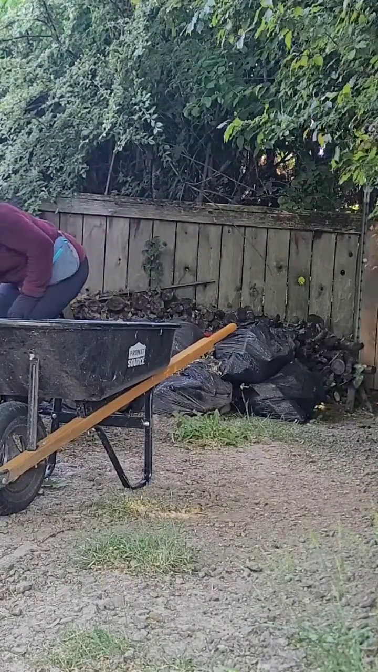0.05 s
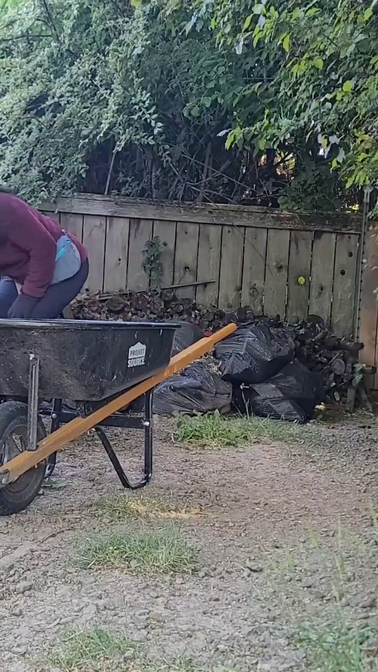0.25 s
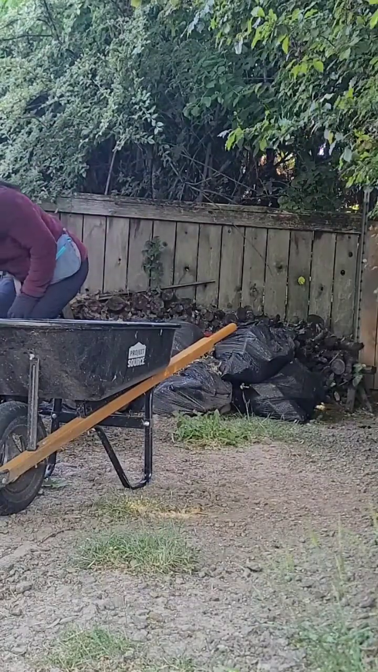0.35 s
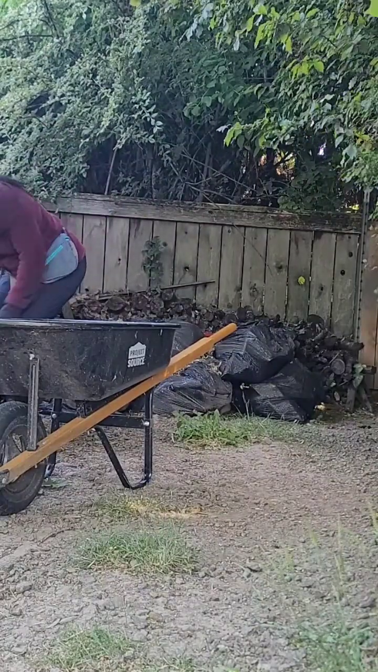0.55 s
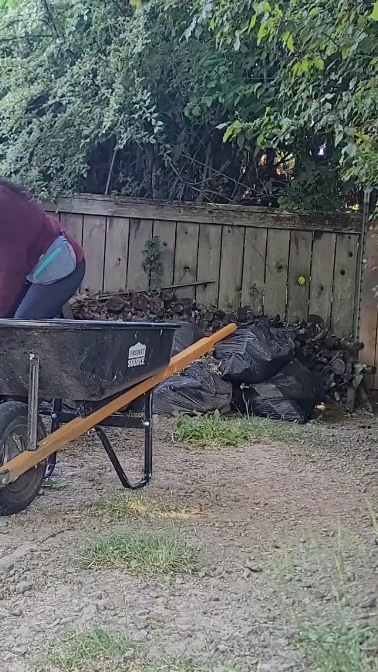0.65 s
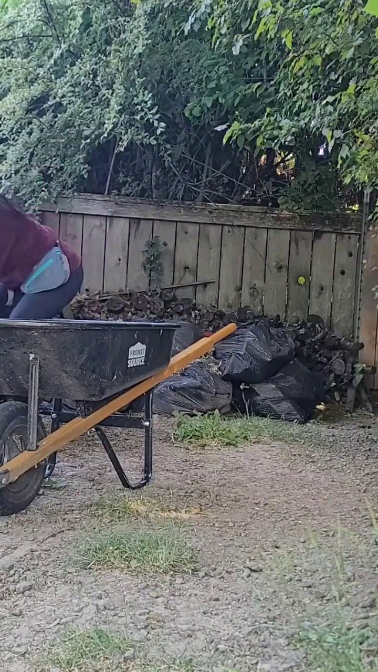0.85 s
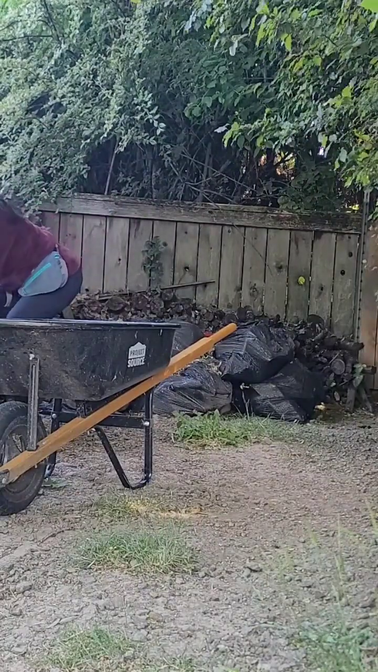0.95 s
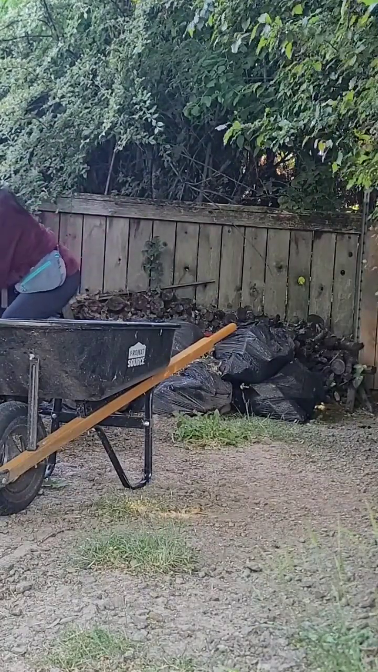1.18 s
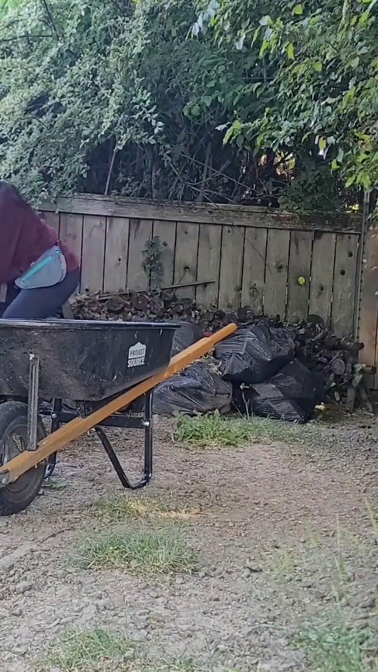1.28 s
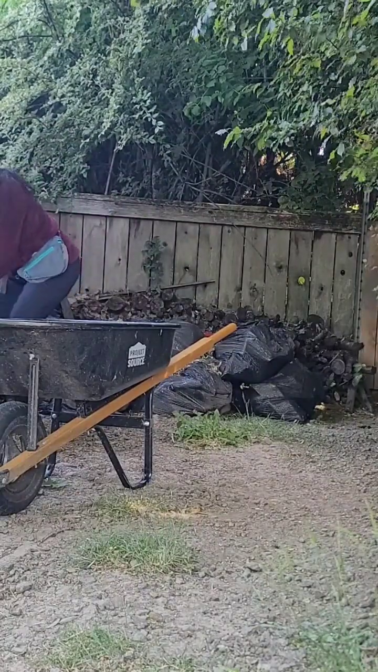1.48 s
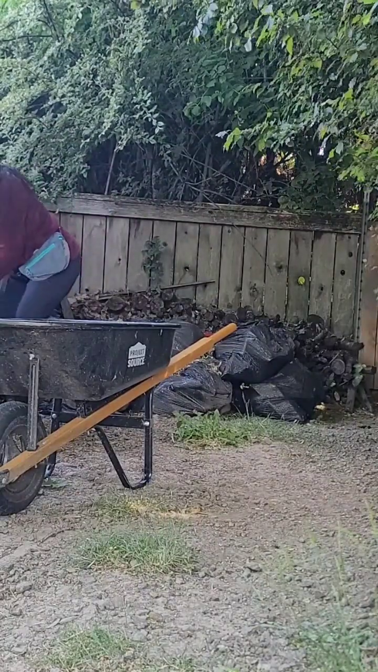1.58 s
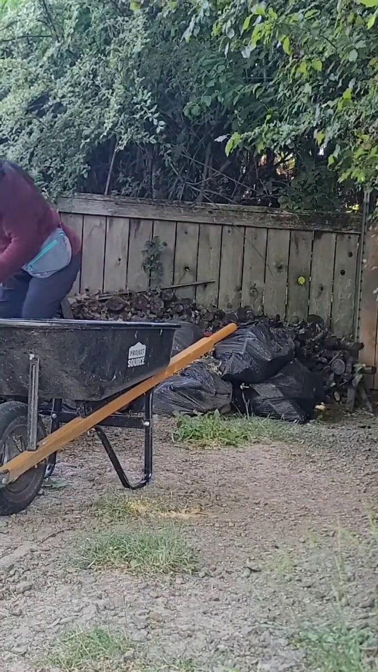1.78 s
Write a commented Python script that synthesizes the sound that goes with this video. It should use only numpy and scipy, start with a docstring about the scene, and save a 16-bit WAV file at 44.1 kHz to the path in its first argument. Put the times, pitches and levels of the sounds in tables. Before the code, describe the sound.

Empty cans rattle and crackle in a plastic bag lifted twice, then settling in a yard.

```python
"""A plastic bag of empty cans, heaved twice and set down, a few metres off to the left in a fenced yard.
Thin can walls crunch, crackle and ring against each other while the whole load thuds and drags.
The plastic squeaks as it is pulled taut; as the bag settles it swishes, hollow bottles bump
and loose cans ping. A pair of microphones picks up the clatter, its quick return off ground
and fence, and a low outdoor rumble."""
import sys
import numpy as np
from scipy import signal
from scipy.fft import rfft, irfft, next_fast_len
from scipy.io import wavfile

SR = 44100
rng = np.random.default_rng(int(sys.argv[2]) if len(sys.argv) > 2 else 0)


def put_to_file(sound):
    """Save the sound as 16-bit audio at rate SR, in the file named by the first command-line argument."""
    columns = np.atleast_2d(sound).T  # one column per channel
    safe = np.clip(columns, -1, 1)
    whole_steps = np.round(safe * 32767)
    wavfile.write(sys.argv[1], SR, whole_steps.astype(np.int16))


N = 81585
T = np.arange(N) / SR

# Outdoor rumble. Each row: frequency in Hz, relative level in dB.
RUMBLE_SPECTRUM = [(25, -21), (45, -7), (68, 6.5), (100, -6.5), (170, -16.5), (400, -29.5), (1300, -36),
                   (4000, -29), (15000, -49)]
# The load stirring in the bag. Each row: time in seconds, force level in dB.
STIRRING = [(0, -42), (.04, -42), (.09, -36.5), (.2, -34.5), (.72, -49), (.76, -43.5), (.795, -32.5),
            (.84, -39.5), (.89, -34), (1.2, -42.5), (1.32, -41.5), (1.4, -54), (1.56, -43), (1.66, -55.5),
            (1.85, -67.5)]
# One list per heave. Each row: time in seconds, relative crunch force and ringing force in dB.
HEAVES = [
    [(.226, -30.5, -27.5), (.245, -28.5, -22.5), (.31, -28.5, -21), (.392, -29, -25), (.44, -23, -18),
     (.52, -26, -19), (.6, -31, -25.5), (.635, -37.5, -35.5), (.68, -39, -34), (.715, -58, -46.5)],
    [(.903, -30, -24), (.945, -32.5, -30.5), (.999, -29, -27), (1.037, -24, -23), (1.085, -26, -26.5),
     (1.119, -33, -29.5), (1.155, -45, -43), (1.19, -50.5, -62)],
]
# Single knocks. Each row: start in seconds, crunch force and ringing force in dB, rattle decay in seconds.
KNOCKS = [(.061, -28, -36, .007), (.121, -32, -29, .035), (.226, -22, -21, .012), (.297, -26, -14, .008),
          (.331, -28, -13, .008), (.436, -20, -14, .01), (.463, -24, -14, .004), (.502, -22, -15, .008),
          (.56, -26, -16, .006), (.59, -27, -19, .005), (.771, -35, -40, .015), (.902, -21, -22, .008),
          (.943, -23, -22, .005), (.968, -25, -19, .012), (1.026, -21, -20, .01), (1.261, -37, -39, .018),
          (1.29, -35, -39, .02), (1.312, -37, -38, .012), (1.434, -29, -46, .03), (1.451, -19, -25, .017),
          (1.489, -21, -26, .02), (1.547, -24, -36, .004), (1.624, -43, -58, .008), (1.678, -33, -49, .006),
          (1.699, -30, -33, .01)]
# Dead crunch of crumpling walls and plastic. Each row: frequency in Hz, relative level in dB.
CRUNCH_SPECTRUM = [(60, -27), (110, -15.5), (180, -20), (290, -21), (430, -7.5), (600, -12.5), (780, -3),
                   (1000, -6), (1350, 0.5), (1800, -1), (2300, -9.5), (3000, -16), (4500, -17),
                   (6500, -14.5), (8000, -35.5), (15000, -28.5)]
# Sharp crackle of thin metal. Each row: frequency in Hz, relative level in dB.
CRACKLE_SPECTRUM = [(500, -32), (1500, 2), (2300, 2.5), (3200, -7), (4100, -8), (4600, -10.5), (6200, 5.5),
                    (7700, -58.5), (9000, -22), (9800, -18), (11000, -25), (12200, -48), (14000, -25),
                    (15800, -38)]
# Modes of an empty can. Each row: pitch in Hz, relative level in dB, spread among cans in Hz,
# time to fall 60 dB in seconds.
CAN_MODES = [(3568, -5, 79, 0.19), (3759, -7, 240, 0.024), (5193, -6, 136, 0.058), (5716, -13, 248, 0.077),
             (6130, -13, 150, 0.14), (6660, -22.5, 200, 0.021), (8550, -18.5, 140, 0.045),
             (9050, -19.5, 130, 0.13), (10360, -23.5, 170, 0.16), (11020, -24.5, 200, 0.084),
             (13000, -29, 190, 0.093), (13800, -26.5, 160, 0.057), (15000, -27, 380, 0.055)]
# The load thudding and dragging. Each row: time in seconds, level in dB.
THUD_LEVELS = [(0, -69.5), (.26, -47.5), (.32, -43), (.45, -38), (.62, -38.5), (.69, -58.5), (.86, -53.5),
               (.91, -47), (1.02, -44.5), (1.12, -43), (1.18, -55.5), (1.3, -44), (1.38, -79), (1.45, -53),
               (1.57, -51), (1.62, -67), (1.85, -79)]
# Tone of that thudding. Each row: frequency in Hz, relative level in dB.
THUD_SPECTRUM = [(30, -20), (60, 0), (100, -2.5), (135, -8), (180, 6), (240, -19), (400, -17),
                 (1500, -22.5), (8000, -57)]
# Squeaks just before the second heave. Each row: start in seconds, pitch in Hz, level in dB.
SQUEAKS = [(.853, 6400, -41), (.872, 6600, -38), (.888, 6650, -55)]
# Bottles bumping. Each row: start in seconds, pitch in Hz, level in dB.
BOTTLE_BUMPS = [(1.129, 510, -32), (1.168, 566, -27), (1.211, 510, -23.5), (1.257, 360, -36),
                (1.288, 445, -30), (1.364, 383, -31), (1.368, 600, -41), (1.396, 444, -31)]
# Plastic sliding. Each row: start in seconds, level in dB, decay in seconds.
SWISHES = [(1.2, -55.5, 0.46), (1.357, -36.5, 0.03)]
# Tone of the sliding plastic. Each row: frequency in Hz, relative level in dB.
SWISH_SPECTRUM = [(500, -0.5), (2500, -21), (6000, -3.5), (9000, -9), (14000, -8), (16000, -17)]
# Taps on loose cans. Each row: start in seconds, level in dB.
PINGS = [(1.213, -33.5), (1.262, -47), (1.311, -50), (1.627, -50.5)]
# Modes of a loose can. Each row: pitch in Hz, relative level in dB, time to fall 60 dB in seconds.
PING_MODES = [(3095, -1.5, 0.065), (3180, -1, 0.066), (4800, 0, .07), (5510, -5, .1), (6080, -20, .07),
              (7150, -4.5, 0.066), (7140, -8, 0.076)]
# Arrival at the microphones. Each row: frequency in Hz, phase lead of the left one in radians.
LEFT_LEAD = [(30, 1), (100, -0.1), (300, 0), (800, 1.24), (1500, 2), (3000, 4), (3700, 3.5), (5200, 4.2),
             (6100, 5.0), (7000, 7.5), (8500, 9), (11000, 9.5), (15000, 13)]
# Balance of the microphones. Each row: frequency in Hz, level of left over right in dB.
LEFT_BALANCE = [(60, -0.5), (250, -0.7), (600, 1.5), (1500, 1.5), (2800, 3), (3600, -2), (5200, 2),
                (6100, -3.5), (7200, 0), (8400, 6), (9200, 2.5), (11000, -2.5), (15000, 1.5)]

BAG_WIDTH = 0.23   # spread of directions across the bag, as a fraction of the left lead


def from_db(db):
    """Decibels to gain."""
    return 10 ** (np.asarray(db) / 20)


def unit_power(x):
    """Scale to unit power."""
    return x / np.sqrt(np.mean(x ** 2) + 1e-20)


def at_hz(points, hz):
    """Read a table on a log-frequency axis."""
    freqs, values = np.transpose(points)
    return np.interp(np.log(np.maximum(hz, 1)), np.log(freqs), values)


def dying(start, decay_s):
    """A sudden start and an exponential decay."""
    return (T >= start) * np.exp(-np.maximum(T - start, 0) / decay_s)


def ring(x, hz, t60):
    """One mode: a unit click sets a sine of height 1 ringing."""
    radius, angle = from_db(-60 / (t60 * SR)), 2 * np.pi * hz / SR
    return signal.lfilter([0, np.sin(angle)], [1, -2 * radius * np.cos(angle), radius ** 2], x + 1e-18)


def colour(x, spectrum, size=4096):
    """Causal filter of unit energy, shaped like the given spectrum."""
    hz = np.arange(size // 2 + 1) * SR / size
    cepstrum = irfft(np.log(from_db(at_hz(spectrum, hz))))
    cepstrum[size // 2:] = 0
    response = irfft(np.exp(2 * rfft(cepstrum)))
    return signal.fftconvolve(x, response / np.linalg.norm(response))[:N]


def at_microphones(x, direction=1):
    """A sound from the left reaches the left microphone first; direction 1 is the middle of the bag."""
    size = next_fast_len(N + 2000)
    hz = np.arange(size // 2 + 1) * SR / size
    lag = np.exp(-1j * direction * at_hz(LEFT_LEAD, hz))
    return np.array([x, irfft(rfft(x, size) * lag, size)[:N]])


def outdoor_rumble(level_db=-51.5, likeness=0.91):
    """The low background of the yard, nearly the same at both microphones."""
    mid, side = (colour(noise, RUMBLE_SPECTRUM) for noise in rng.standard_normal((2, N)))
    pair = np.sqrt((1 + likeness) / 2) * mid + np.sqrt((1 - likeness) / 2) * np.array([side, -side])
    return from_db(level_db) * pair


def contacts(per_s=2600, spread_db=4.0, surge_db=1, surges_per_s=150):
    """Tiny collisions inside the bag: random clicks of uneven strength, in slight surges."""
    clicks = (rng.random(N) < per_s / SR) * rng.choice([-1, 1], N)
    strength_db = spread_db * np.clip(rng.standard_normal(N), -2, 2)
    surge = np.interp(T * surges_per_s, np.arange(1000), rng.standard_normal(1000))
    return unit_power(clicks * from_db(strength_db + surge_db * surge))


def handling(clicks, column, heave_db, attack_s=0.0036, release_s=0.022, knock_rise_s=.0015):
    """Stirring, heaves and knocks set the force of the contacts; column 1 is crunch, 2 is ringing."""
    power = from_db(np.interp(T, *np.transpose(STIRRING))) ** 2
    for heave in map(np.array, HEAVES):
        times = heave[:, 0]
        gate = np.clip(np.minimum((T - times[0]) / attack_s, (times[-1] - T) / release_s) + 1, 0, 1)
        power += (gate * from_db(heave_db + np.interp(T, times, heave[:, column]))) ** 2
    impacts = np.zeros(N)
    for knock in KNOCKS:   # one hard hit, then a short rattle
        start, gain, decay_s = knock[0], from_db(knock[column]), knock[-1]
        impacts[int(start * SR)] = 3.5 * gain
        rise = np.clip((T - start) / knock_rise_s, 0, 1)
        power += (gain * dying(start, decay_s) * rise) ** 2
    return clicks * np.sqrt(power) + impacts


def crumpling(force, spectrum, level_db, places=5):
    """The dead part of the contacts, from several places in the bag, each with its own reflections."""
    place_hit, out = rng.integers(0, places, N), 0
    for k, place in enumerate(np.linspace(-1, 1, places)):
        direct = at_microphones(colour(force * (place_hit == k), spectrum), 1 + BAG_WIDTH * place)
        out = out + direct + yard_reflections(direct)
    return from_db(level_db) * out


def ringing_cans(force, count=24, level_db=-2):
    """Each contact rings one of many cans, all dented and so tuned a little differently."""
    can_hit, out = rng.integers(0, count, N), 0
    ranks = (np.arange(count) + .5) / count
    bell_curve = np.log(ranks / (1 - ranks)) / np.sqrt(np.pi)
    detunings = np.array([rng.permutation(bell_curve) for _ in CAN_MODES]).T
    for k in range(count):
        hits, can = np.flatnonzero(can_hit == k), 0
        for (hz, db, spread_hz, t60), detune in zip(CAN_MODES, detunings[k]):
            strikes = np.zeros(N)
            strikes[hits] = force[hits] * rng.standard_normal(len(hits))
            unit_energy = np.sqrt(4 * np.log(1000) / (t60 * SR))
            can = can + from_db(db) * unit_energy * ring(strikes, hz + spread_hz * detune, t60)
        out = out + at_microphones(can, 1 + BAG_WIDTH * rng.standard_normal())
    return from_db(level_db) * out


def yard_reflections(x, t60=0.1, delay_s=.002, low_cut_hz=288, level_db=-1.5):
    """Scattered returns from ground and fence, different at each microphone."""
    t = T[:SR // 2]
    tails = rng.standard_normal((2, len(t))) * (t > delay_s) * 1000.0 ** (-t / t60)
    tails /= np.linalg.norm(tails, axis=1, keepdims=True)
    reflected = signal.fftconvolve(x, tails, axes=1)[:, :N]
    low_cut = signal.butter(2, low_cut_hz, "high", fs=SR, output="sos")
    return from_db(level_db) * signal.sosfilt(low_cut, reflected)


def load_thuds():
    """The bulk of the bag thuds and drags: swells of low noise."""
    level = from_db(np.interp(T, *np.transpose(THUD_LEVELS)))
    return at_microphones(colour(rng.standard_normal(N), THUD_SPECTRUM) * level)


def plastic_squeaks(decay_s=0.014, t60=0.053):
    """The bag is pulled taut and gives short, high squeaks."""
    out = 0
    for start, hz, db in SQUEAKS:
        tone = unit_power(ring(rng.standard_normal(N), hz, t60))
        out = out + from_db(db) * tone * dying(start, decay_s)
    return at_microphones(out)


def bottle_bumps(rattle_s=.022, t60=.05, softness_hz=1100):
    """Soft rattling bumps, each waking one damped hollow note."""
    out = 0
    for start, hz, db in BOTTLE_BUMPS:
        rattle = rng.standard_normal(N) * dying(start, rattle_s)
        out = out + from_db(db) * ring(rattle / np.linalg.norm(rattle), hz, t60)
    soft_contact = signal.butter(2, softness_hz, fs=SR, output="sos")
    return at_microphones(signal.sosfilt(soft_contact, out))


def plastic_swishes():
    """Plastic slides on plastic with a bright friction hiss."""
    level = sum(from_db(db) * dying(start, decay_s) for start, db, decay_s in SWISHES)
    return at_microphones(colour(rng.standard_normal(N), SWISH_SPECTRUM) * level)


def can_pings():
    """A loose can is tapped and rings clearly."""
    taps = np.zeros(N)
    for start, db in PINGS:
        taps[int(start * SR)] = from_db(db)
    return at_microphones(sum(from_db(db) * ring(taps, hz, t60) for hz, db, t60 in PING_MODES))


def scene():
    """The bag a few metres left of the microphones, with the yard's reflections and rumble."""
    clicks = contacts()
    crunch_force = handling(clicks, column=1, heave_db=3.5)
    ring_force = handling(clicks, column=2, heave_db=6.0)
    crunch = crumpling(crunch_force, CRUNCH_SPECTRUM, level_db=-0.5)
    crackle = crumpling(ring_force, CRACKLE_SPECTRUM, level_db=-11)
    bag = ringing_cans(ring_force) + can_pings() + bottle_bumps()
    bag += plastic_swishes() + plastic_squeaks() + load_thuds()
    return crunch + crackle + bag + yard_reflections(bag) + outdoor_rumble()


def record(dry, cutoff_hz=15750):
    """Each microphone has its own colour; any peak over full scale clips and the top is cut."""
    balance_db = at_hz(LEFT_BALANCE, np.arange(N + 1) * SR / (2 * N))
    microphone_gains = from_db(np.outer([.5, -.5], balance_db))
    heard = irfft(rfft(dry, 2 * N) * microphone_gains)[:, :N]
    high_cut = signal.ellip(10, .2, 70, cutoff_hz, fs=SR, output="sos")
    return signal.sosfilt(high_cut, np.clip(heard, -1, 1))


dry = scene()
out = record(dry)
put_to_file(out)
```